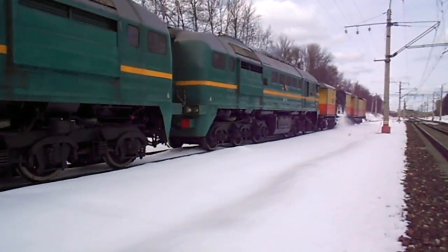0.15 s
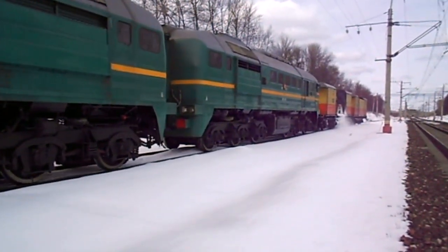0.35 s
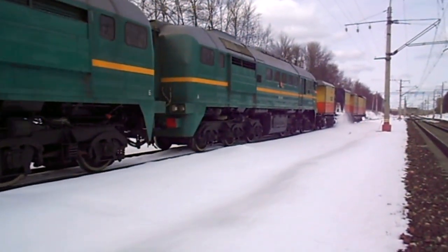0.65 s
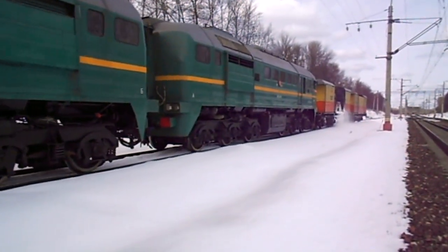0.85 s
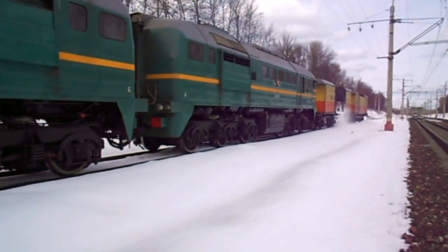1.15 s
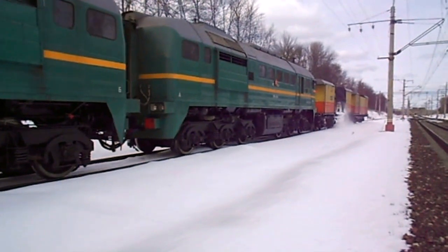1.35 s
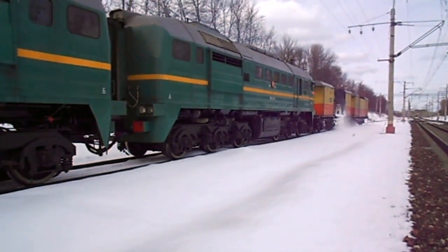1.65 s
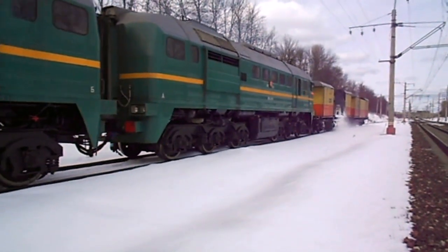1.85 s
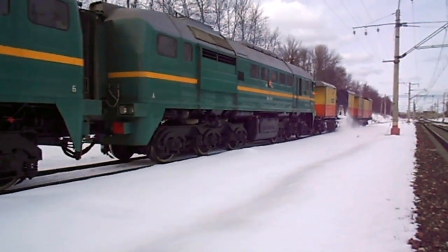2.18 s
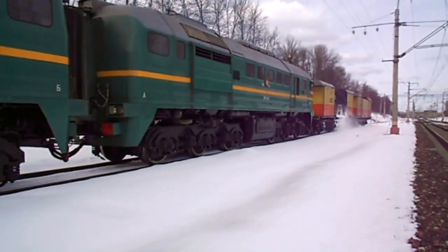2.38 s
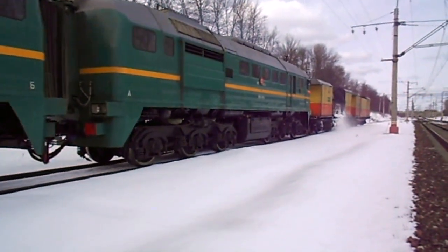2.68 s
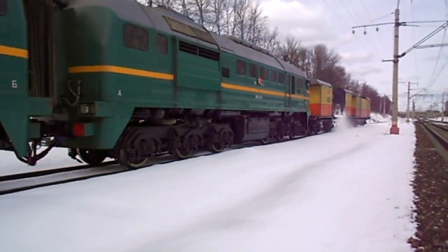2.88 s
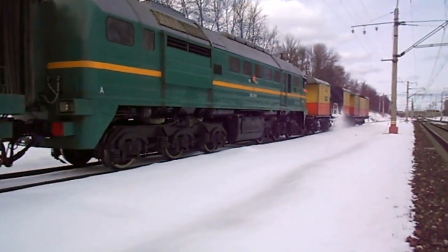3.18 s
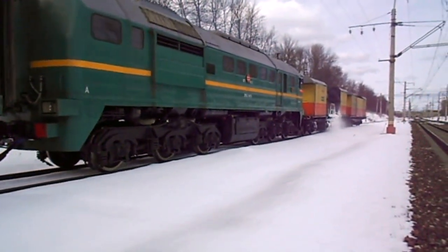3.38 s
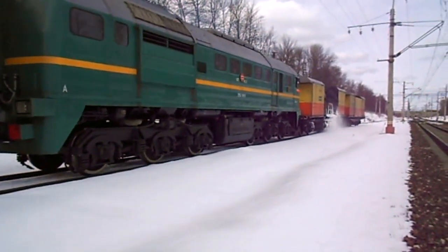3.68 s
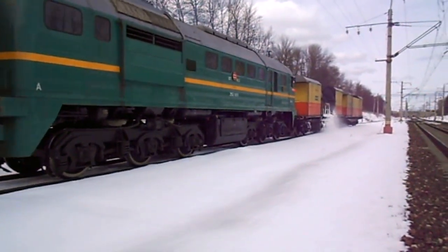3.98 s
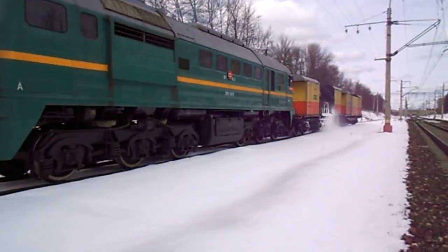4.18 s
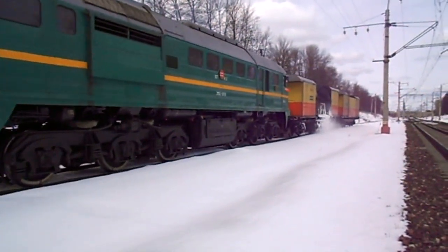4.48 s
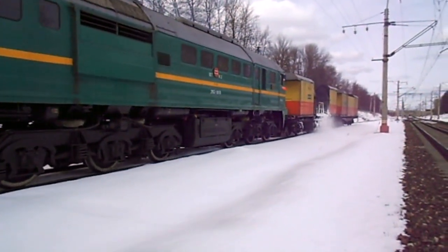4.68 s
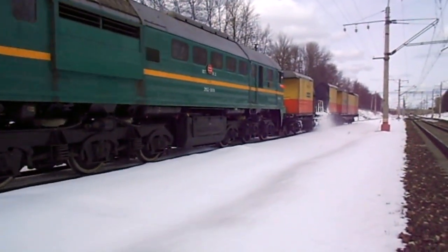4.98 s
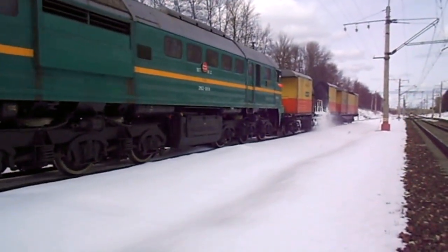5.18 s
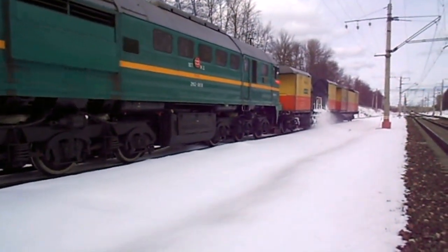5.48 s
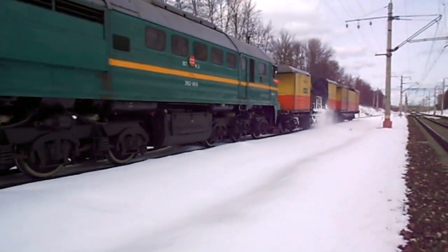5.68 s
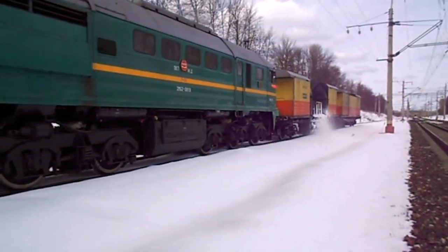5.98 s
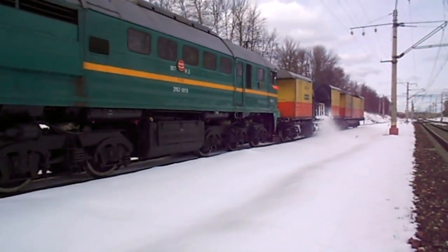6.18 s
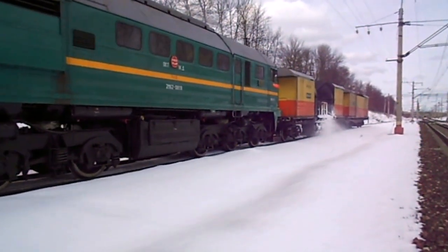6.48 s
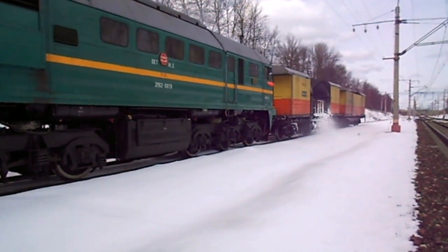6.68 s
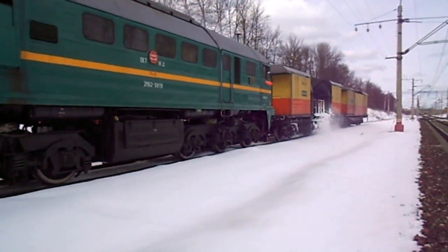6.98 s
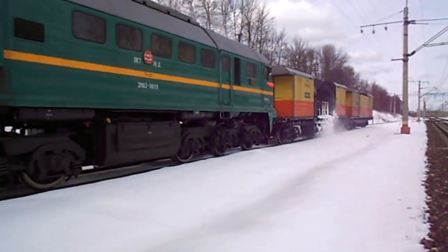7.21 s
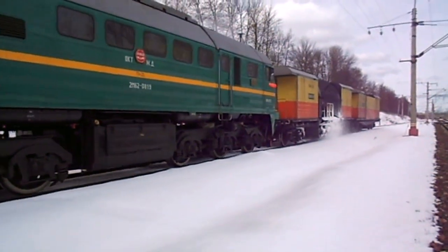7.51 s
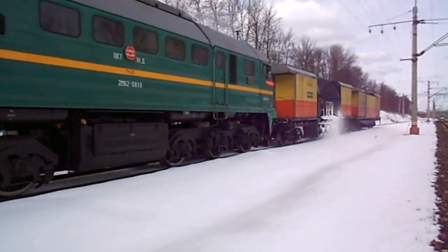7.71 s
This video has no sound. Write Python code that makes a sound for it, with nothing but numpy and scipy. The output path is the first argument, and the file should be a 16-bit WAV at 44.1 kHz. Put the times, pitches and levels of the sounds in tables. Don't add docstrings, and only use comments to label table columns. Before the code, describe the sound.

A two-section diesel locomotive rolls slowly past, close by, its deep throbbing rumble beating under faint whines, hiss, wheel squeaks and loose metallic clanks.

```python
import sys
import numpy as np
from scipy import signal
from scipy.fft import rfft, irfft, next_fast_len
from scipy.io import wavfile
from scipy.ndimage import uniform_filter1d, map_coordinates

SR = 44100
rng = np.random.default_rng(int(sys.argv[2]) if len(sys.argv) > 2 else 0)


def dump(signal):
    limited = np.clip(np.atleast_2d(signal).T, -1, 1)
    pcm = np.round(limited * 32767).astype(np.int16)
    wavfile.write(sys.argv[1], SR, pcm)


def voltage_ratio(level):
    return 10 ** (np.asarray(level, float) / 20)


N = 346185
TIME = np.arange(N) / SR

# time_s, speed_turns_per_s, firing_tone_db
FRONT_SHAFT = [(0.0, 6.5448, -18.6), (0.71, 6.5495, -17.9), (1.43, 6.5542, -19.7), (2.14, 6.5581, -20.8),
               (2.85, 6.5601, -17.8), (3.57, 6.5591, -19.4), (4.28, 6.5537, -20.1), (5.0, 6.5434, -19.1),
               (5.71, 6.529, -22.5), (6.42, 6.5126, -21.2), (7.14, 6.4955, -21.2), (7.85, 6.4785, -21.8)]


def unit(x):
    return x / np.sqrt(np.mean(x ** 2) + 1e-20)


def curves(rows):
    s, *columns = np.transpose(rows)
    return [np.interp(TIME, s, column) for column in columns]


def wobble(rate):
    coarse = TIME[::64]
    knots = rng.standard_normal(int(N * rate / SR) + 4)
    return np.interp(TIME, coarse, map_coordinates(knots, [coarse * rate]))


def filtered(x, response):
    m = next_fast_len(len(x) + 8192)
    return irfft(rfft(x, m) * response(np.fft.rfftfreq(m, 1 / SR)), m)[:len(x)]


def peak(hz, width_hz):
    return lambda f: 1j * f * width_hz / (hz * hz - f * f + 1j * f * width_hz)


def rush(spectrum, patchy_db):
    z = signal.stft(rng.standard_normal(N + 512), nperseg=512)[2]
    patches = uniform_filter1d(rng.standard_normal(z.shape), size=8, axis=0)
    patches = uniform_filter1d(patches, size=8, axis=1)
    noise = signal.istft(z * voltage_ratio(patchy_db * unit(patches)), nperseg=512)[1][:N]
    f, level_db = np.transpose(spectrum)
    log_f = np.log(f + 1)
    return unit(filtered(noise, lambda hz: voltage_ratio(np.interp(np.log(hz + 1), log_f, level_db, right=-120))))


def passing(s, width):
    return np.exp(-((TIME - s) / width) ** 2)


def swells(rows):
    coarse = TIME[::64]
    total_db = sum(db * np.exp(-((coarse - s) / width) ** 2) for s, width, db in rows)
    return np.interp(TIME, coarse, total_db)


def nearness(db, share, drift_db):
    # time_s, nearness_db
    bogies = [(0.0, -40), (0.28, -38.5), (0.5, -37), (0.65, -36), (1.05, -40), (1.49, -40), (2.12, -37.5),
              (3.04, -37.5), (3.28, -39.5), (3.67, -38), (3.96, -37.5), (4.66, -35.5), (4.98, -38),
              (6.21, -38), (6.67, -36), (7.85, -35.5)]
    near_db, = curves(bogies)
    return voltage_ratio(db + share * (near_db - near_db.mean()) + drift_db * (TIME - TIME.mean()))


def wind():
    # time_s, peak_db
    gusts = [(.55, -26), (.95, -22.5), (1.53, -29.5), (2.05, -25), (2.75, -23.5), (3.1, -22.5),
             (3.68, -18.5), (4.0, -22.5), (4.7, -25.5), (5.3, -23), (5.9, -27.5), (6.3, -27.5), (6.67, -22),
             (7.35, -25), (7.85, -28)]
    # frequency_hz, density_db
    spectrum = [(3, -13), (8, 4), (13, 2.5), (20, 9.5), (30, 3), (45, -10.5), (100, -120)]
    rise_db_per_s, fall_db_per_s, calm_db = 43, 41, -31.5
    each_db = []
    for s, db in gusts:
        drop_db = np.maximum(rise_db_per_s * (s - TIME), fall_db_per_s * (TIME - s))
        each_db.append(db - drop_db)
    level_db = np.maximum(np.max(each_db, axis=0), calm_db)
    return voltage_ratio(level_db + 2.0 + 1.5 * wobble(3.27)) * rush(spectrum, patchy_db=1.0)


def hiss(shake):
    # time_s, half_width_s, swell_db
    gaps = [
        (1.2, .12, -1.3),
        (2.256, .03, 4),
        (2.62, .1, -1),
        (2.9, .1, 1),
        (3.22, .07, -1.8),
        (3.5, .06, 1),
        (5.65, .12, 1),
        (5.85, .08, -1.4),
        (7.2, .1, -1),
    ]
    # frequency_hz, density_db
    fan_spectrum = [(900, -120), (1600, -5), (2000, -1), (2500, -0.5), (3700, 0), (4600, -2.5), (5600, -8),
                    (6500, -23.5), (9000, -120)]
    # frequency_hz, density_db
    wheel_spectrum = [(3500, -120), (5600, -3), (6500, -3), (7500, -3.5), (8700, -4.5), (9500, -9.5),
                      (10400, -15.5), (11100, -13)]
    flutter = voltage_ratio(.3 * shake + .55 * wobble(18) + swells(gaps))
    fans = nearness(-46, share=1.0, drift_db=0.28) * flutter * rush(fan_spectrum, patchy_db=0.7)
    wheels = nearness(-55, share=1, drift_db=-.05) * flutter * rush(wheel_spectrum, patchy_db=1.0)
    return fans + wheels


def rims():
    ring = unit(filtered(rng.standard_normal(N), lambda f: peak(7530, 1100)(f) ** 2))
    return nearness(-64, share=.9, drift_db=-.7) * voltage_ratio(1.5 * wobble(4.2)) * ring


def chirp(length, hz, width):
    t = np.arange(int(length * SR) + 64) / SR
    waver = unit(uniform_filter1d(rng.standard_normal(SR // 4), size=150))[:len(t)]
    pitch = hz + width * waver * .28
    chatter = 1 + 0.44 * np.sin(2 * np.pi * (rng.uniform(38, 66) * t + rng.random()))
    shape = np.abs(np.sin(np.pi * t / t[-1])) ** 0.52 * chatter
    return shape * np.sin(2 * np.pi * np.cumsum(pitch) / SR)


def squeaks():
    # start_s, length_s, pitch_hz, level_db
    near = [(.21, .022, 7550, -55), (.218, 0.022, 8750, -59), (.675, .015, 8000, -57),
            (.335, 0.052, 1480, -41), (.42, 0.1, 1470, -49), (.525, 0.056, 1473, -36.5),
            (.59, 0.055, 1476, -37), (.516, 0.033, 7030, -45.5), (1.12, .031, 7690, -53),
            (1.335, .022, 7420, -52), (1.412, .02, 7860, -53), (1.76, 0.16, 1362, -42),
            (1.949, 0.12, 1358, -36.5), (3.308, .035, 7210, -52), (3.355, .035, 7120, -59),
            (3.13, .07, 7080, -61), (3.575, 0.1, 6720, -51), (3.69, .04, 6650, -61),
            (3.585, 0.14, 10380, -63), (3.86, .08, 8600, -59), (4.2, .05, 8600, -59),
            (4.285, .075, 8650, -59), (4.47, .05, 8510, -56), (4.94, .1, 8680, -60),
            (5.345, .04, 7700, -55), (5.78, 0.14, 7200, -53), (5.91, .055, 7190, -54),
            (6.1, .06, 7040, -58.5), (6.207, 0.068, 7300, -47), (6.276, .018, 7350, -48),
            (6.205, .05, 7950, -61), (6.8, .09, 7120, -61), (6.3, .045, 7300, -55), (6.93, .04, 3830, -50),
            (7.07, .07, 3950, -50), (7.47, .1, 7300, -59), (7.68, .04, 7300, -60),
            (7.268, 0.045, 5490, -40.5), (7.43, .06, 6350, -57)]
    far = rng.uniform((0, .012, 6199.0, -70.0), (N / SR, .06, 9000, -61), size=(75, 4))
    out = np.zeros(N + SR)
    for s, length, hz, db in [*near, *far]:
        squeak = chirp(length, hz, width=.019 * hz)
        out[round(s * SR):][:len(squeak)] += voltage_ratio(db + 0.5) * squeak
    return out[:N]


def knock(t, hz, length, crack_share):
    noise = rng.standard_normal((2, len(t)))
    crack = unit(filtered(noise[0], lambda f: peak(4600, 7000)(f) ** 3.3 + .4 * peak(4200, 700)(f)))
    rough = unit(filtered(noise[1], lambda f: peak(hz, min(800, .4 * hz))(f) ** 2))
    tone = (length < .1) * np.sin(2 * np.pi * hz * t)
    ring = 0.55 * tone + 0.82 * rough
    decay = voltage_ratio(-24 * t / length) * (1 - np.exp(-t / 0.0008))
    return decay * (crack_share * crack + (1 - crack_share) * ring)


def ticks():
    # time_s, peak_db, ring_hz, length_s, crack_share
    clanks = [(2.226, -27, 1250, .03, .1), (2.229, -21, 930, 0.05, 0), (2.234, -23, 790, .04, 0),
              (2.29, -28, 900, .03, 0.04), (2.252, -23, 730, 0.054, 0.07), (2.42, -33, 815, .2, 0),
              (2.8, -39, 1800, 0.28, 0.13), (3.443, -34, 2500, .025, .2), (3.463, -38, 2100, .03, .1),
              (3.503, -34, 2300, .025, .2), (3.548, -36, 2300, .02, .1), (3.558, -31, 1800, .025, 0),
              (3.584, -37, 2000, .02, .1), (3.598, -37, 1800, .02, 0), (6.303, -29, 4600, 0.016, 0.4),
              (6.306, -30, 3600, .022, .2), (6.312, -30, 4900, 0.013, 0.35)]
    # time_s, peak_db, ring_hz, length_s
    knocks = [(0.214, -36, 7500, 0.022), (0.341, -34.5, 7500, 0.02), (0.534, -38, 5500, .02),
              (2.235, -41, 5600, 0.05), (2.246, -36, 6500, .04), (2.257, -38, 5200, 0.037),
              (2.27, -38.5, 4300, .04), (2.3, -40.5, 2900, .02), (3.14, -43, 5000, .02),
              (3.214, -46, 4450, 0.018), (4.604, -36, 6500, .02), (4.026, -35, 4180, 0.028),
              (6.926, -39, 3800, 0.073)]
    # time_s, peak_db, ring_hz
    chinks = [(6.206, -33, 8350), (6.221, -30.5, 8350), (6.243, -34, 8350), (6.29, -43, 7900),
              (6.793, -30.5, 7770), (6.93, -38, 8150), (6.945, -37, 7900), (6.968, -38, 8100)]
    # time_s, peak_db
    rattle = [(3.78, -39), (3.87, -36.5), (3.922, -38), (4.07, -34), (4.152, -35.5), (4.195, -36),
              (4.228, -35.5), (4.288, -33), (4.35, -31), (4.396, -32), (4.478, -34), (4.503, -37),
              (4.516, -39), (4.547, -32.5), (4.596, -37)]
    blows = [*clanks]
    blows += [(*row, .7) for row in knocks]
    blows += [(s, db, hz, 0.0093, .18) for s, db, hz in chinks]
    blows += [(s, db, 8560, 0.025, 0.45) for s, db in rattle]
    out, t = np.zeros(N + SR), np.arange(SR // 5) / SR
    for s, db, hz, length, crack_share in blows:
        out[round(s * SR):][:len(t)] += voltage_ratio(db - 4.0) * knock(t, hz, length, crack_share)
    return out[:N]


def panels():
    # resonance_hz, width_hz, level_db
    modes = [
        (612, 55, -43.5),
        (752.7, 47, -43),
        (871.6, 35, -45.5),
    ]
    arrival = .5 + .5 * np.tanh((TIME - 3.6) / .9)
    strands = 0
    for hz, width, db in modes:
        ring = unit(filtered(rng.standard_normal(N), lambda f: peak(hz, width)(f) ** 2))
        strands = strands + voltage_ratio(db + .7 * wobble(5)) * ring
    return arrival * nearness(0.1, share=0.67, drift_db=.1) * strands


def frame_rumble():
    # frequency_hz, density_db
    spectrum = [(25, -120), (45, -0.5), (70, 0), (115, -8), (150, -3.5), (200, -7), (260, -15), (450, -120)]
    # time_s, half_width_s, swell_db
    beams = [
        (2.85, 0.25, 3.7),
        (4.0, .3, 1.4),
        (4.7, 0.27, 1.2),
    ]
    near = nearness(-26.5, share=0.76, drift_db=0.35)
    return near * voltage_ratio(swells(beams) - 2.0) * rush(spectrum, patchy_db=1.6)


def casing_roar():
    # frequency_hz, density_db
    spectrum = [(120, -120), (210, -3.5), (260, 0), (330, -2.5), (470, -7.5), (640, -4.5), (760, -5),
                (880, -7), (1000, -14.5), (1300, -40.5), (2000, -120)]
    return nearness(-30, share=0.67, drift_db=0.067) * rush(spectrum, patchy_db=0.2)


def gear_noise(shake):
    # frequency_hz, density_db
    spectrum = [(600, -120), (900, -5.5), (1050, -1), (1280, 0.5), (1480, -5), (1750, -12.5), (2100, -17.5),
                (3500, -120)]
    # time_s, half_width_s, swell_db
    gearboxes = [
        (2.5, .6, 1.4),
        (3.5, 0.22, 1.5),
        (5.5, .3, 2.5),
    ]
    near = nearness(-39.5, share=1.15, drift_db=-0.091)
    return near * voltage_ratio(0.2 * shake + swells(gearboxes)) * rush(spectrum, patchy_db=0.43)


def machine_tone(phase, level_db, wander):
    return np.sqrt(2) * voltage_ratio(level_db + .5 * wobble(6) - 1.0) * np.cos(phase + wander * wobble(7))


def front_angle():
    return 2 * np.pi * np.cumsum(curves(FRONT_SHAFT)[0]) / SR


def blowers():
    # shaft_ratio, level_db, wander_rad
    tones = [
        (30.6, 0, .4),
        (61.5, -18, .9),
    ]
    # time_s, half_width_s, swell_db
    grilles = [
        (.7, 0.28, 3),
        (2.6, 0.55, 10.5),
        (3.6, 0.37, 5),
        (4.8, .4, 8.5),
        (6.1, 0.92, 15),
    ]
    level_db = -46 + swells(grilles)
    return sum(machine_tone(ratio * front_angle(), db + level_db, wander) for ratio, db, wander in tones)


def gear_whine():
    tones = [(46, .6), (51.8, .9), (61.6, .6), (80, .15), (99.25, .2), (113.3, .35), (115.3, .3),
             (123, 1.6), (192.8, .8)]
    levels = [-56, -56, -60, -54, -54.5, -54, -53.5, -55, -59]
    # time_s, half_width_s, swell_db
    louvres = [
        [(2.3, .15, 13), (2.85, .17, 17), (3.5, .12, 15), (4.05, .25, 13), (5.5, .12, 13), (6.4, .25, 14),
         (7.1, .15, 13)],
        [(.6, .22, 15), (1.9, .12, 11), (2.7, .25, 11), (7.05, .25, 14)],
        [(6.75, .3, 16), (7.3, .3, 18), (7.8, .2, 14)],
        [(.6, 1.3, 8), (1.5, .4, 5), (2.05, .12, 7), (2.7, .45, 11), (4.1, .35, 13)],
        [(.5, .3, 9), (2.0, 1.2, 12.5)],
        [(.6, .5, 13), (1.65, .4, 14), (2.4, .45, 16), (4.6, .25, 12), (5.6, .4, 12)],
        [(.3, .7, 14), (1.7, .4, 15), (2.45, .4, 19.5), (4.1, .15, 11), (4.65, .2, 13)],
        [(2.3, .6, 6)],
        [(.55, .4, 14), (1.5, .55, 12), (2.55, .17, 14), (3.75, .15, 12)],
    ]
    out = 0
    for (ratio, wander), db, beams in zip(tones, levels, louvres):
        out = out + machine_tone(ratio * front_angle(), db + swells(beams), wander)
    return out


def compressor():
    # frequency_hz, level_db, abeam_swell_db
    tones = [
        (75.5, -31.5, 1.5),
        (151, -38.5, 5.5),
    ]
    abeam = passing(2.3, 0.6)
    return sum(machine_tone(2 * np.pi * hz * TIME, db + swell * abeam, .3) for hz, db, swell in tones)


def engine(shaft, orders, orders_db, crank, abeam, drift_db, fades):
    firing_order = 6
    speed, firing_db = curves(shaft)
    slow = slice(None, None, 15)
    angle = 2 * np.pi * (crank + np.cumsum(speed) / SR)[slow]
    out = voltage_ratio((firing_db + swells(fades))[slow]) * np.cos(firing_order * angle)
    swell_db = 2.3 * passing(abeam, 0.71)[slow]
    for order, db, per_s in zip(orders, orders_db, drift_db):
        level_db = db + per_s * (TIME - TIME.mean())[slow]
        level_db = level_db + (order > 11) * swell_db + 1.3 * wobble(2.435)[slow]
        lag = 1.1 * (order > firing_order) + rng.uniform(-0.57, 0.66) + 0.23 * wobble(3.02)[slow]
        out += voltage_ratio(level_db - 0.8) * np.cos(order * angle + lag)
    return np.sqrt(2) * signal.resample_poly(out, 15, 1, padtype="line")[:N]


def rear_engine():
    # time_s, speed_turns_per_s, firing_tone_db
    shaft = [(0.0, 7.7521, -24.1), (0.71, 7.7522, -20.9), (1.43, 7.7524, -21.1), (2.14, 7.7526, -19.5),
             (2.85, 7.7531, -21.1), (3.57, 7.7537, -22.6), (4.28, 7.754, -21.0), (5.0, 7.7539, -20.0),
             (5.71, 7.7534, -22.4), (6.42, 7.7525, -21.2), (7.14, 7.7515, -17.8), (7.85, 7.7504, -16.9)]
    orders = [2, 3, 4, 7, 8, 9, 12, 13, 14, 15, 16, 18, 20, 22, 23, 24, 25, 26, 27]
    orders_db = [-44.5, -38.5, -40.5, -37, -30, -35, -48, -47, -41.5, -44, -50, -49.5, -50.5, -40, -42,
                 -48.5, -48.5, -46.5, -49]
    drift_db = [0.5, 0.2, 0.3, 3, 1.2, 0.4, 1.3, 1.6, 0.57, 0.89, 0.73, .7, 1.7, .95, 1.5, 0.61, 1.5, 0.61,
                0.4]
    # time_s, half_width_s, swell_db
    fades = [
        (.2, .3, -6),
        (.75, .2, 0),
        (2.6, 0.22, 1.5),
        (3.1, 0.14, -6.5),
        (4.05, 0.18, 0.5),
        (4.5, .12, 3),
        (6.05, .22, 2.5),
        (6.85, 0.15, 3),
        (7.5, 0.087, -2),
    ]
    return engine(shaft, orders, orders_db, crank=.7653, abeam=7.0, drift_db=drift_db, fades=fades)


def front_engine():
    orders = [3, 4, 5, 8, 9, 11, 12, 14, 15, 21, 22, 24, 25]
    orders_db = [-38.5, -41, -32, -34.5, -37.5, -43, -48.5, -43, -42.5, -45, -39.5, -42.5, -49.5]
    drift_db = [-.55, -1, -1.3, -0.1, -2, -1.2, -.55, -0.41, -1.2, -1.2, -1.4, -.7, -0.52]
    # time_s, half_width_s, swell_db
    fades = [
        (.5, .15, 2),
        (1.7, .15, -3),
        (2.3, .12, -2),
        (2.65, 0.22, 3),
        (3.1, .13, -2),
        (4.55, 0.18, 3.5),
        (5.3, 0.16, -4.5),
        (6.7, .15, -2),
        (7.5, .12, -6),
    ]
    return engine(FRONT_SHAFT, orders, orders_db, crank=.3062, abeam=2.4, drift_db=drift_db, fades=fades)


def scene():
    shake = wobble(8)
    running_gear = hiss(shake) + rims() + squeaks() + ticks()
    bodies = panels() + frame_rumble() + casing_roar() + gear_noise(shake)
    machines = blowers() + gear_whine() + compressor()
    engines = rear_engine() + front_engine()
    return (wind() + running_gear + bodies + machines + engines)[None]


def band_limit(x):
    return signal.sosfilt(signal.butter(12, 13900, fs=SR, output="sos"), x)


def record(dry):
    # frequency_hz, gain_db
    edge = [(10350, 0), (10700, -8.5), (11025, -17.5)]
    limit_hz = SR / 4
    narrow = filtered(dry[0], lambda hz: (hz < limit_hz) * voltage_ratio(np.interp(hz, *np.transpose(edge))))
    mirror = narrow * np.cos(np.pi * np.arange(N))
    leak = filtered(mirror, lambda hz: voltage_ratio(np.maximum(-5 - 5.3 * ((hz - limit_hz) / 1000) ** 2, -200)))
    return band_limit((narrow + leak)[None])


dry = scene()
out = record(dry)
dump(out)
```